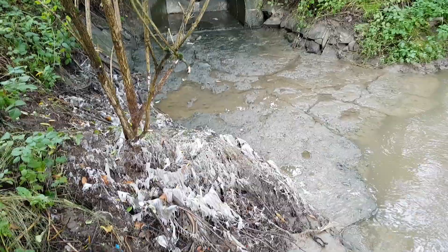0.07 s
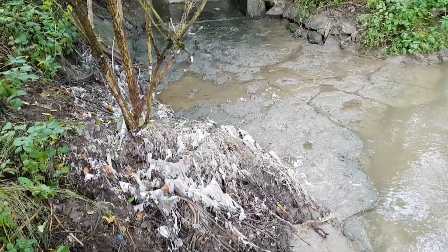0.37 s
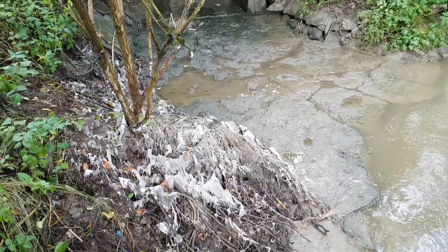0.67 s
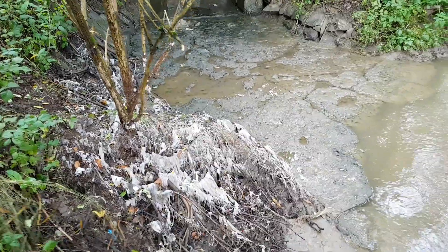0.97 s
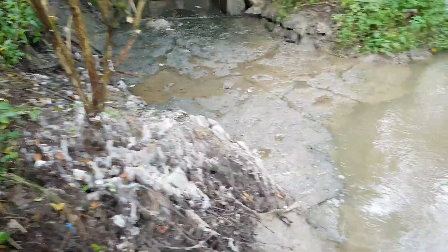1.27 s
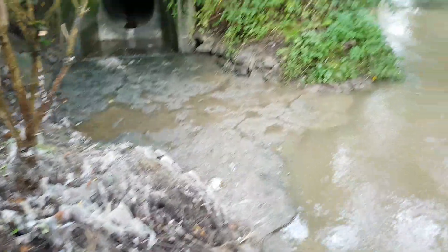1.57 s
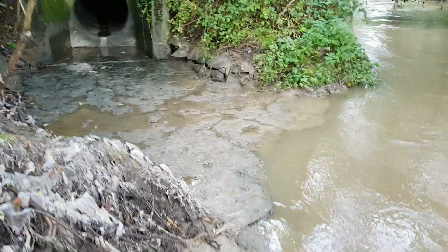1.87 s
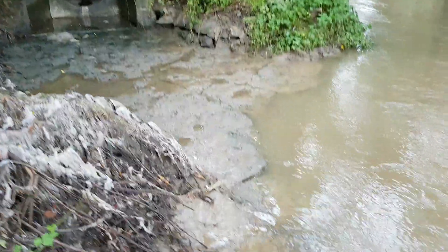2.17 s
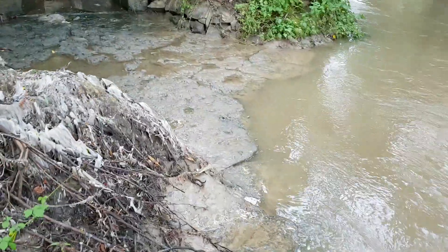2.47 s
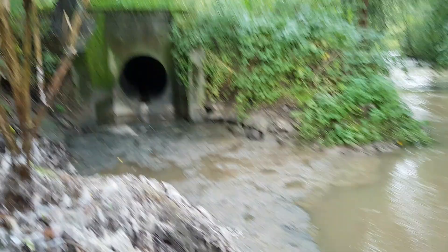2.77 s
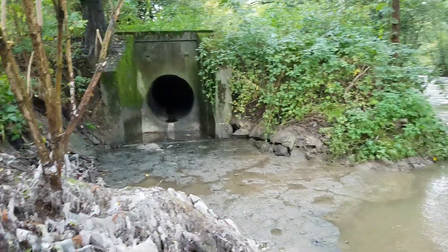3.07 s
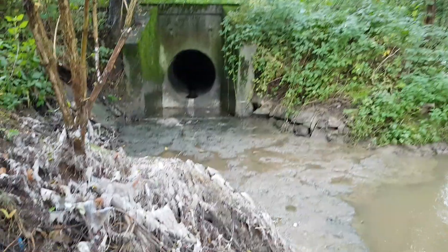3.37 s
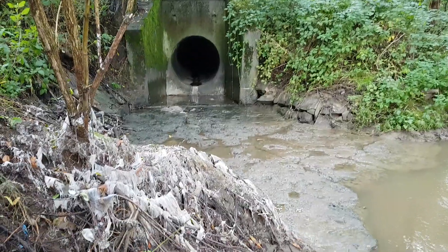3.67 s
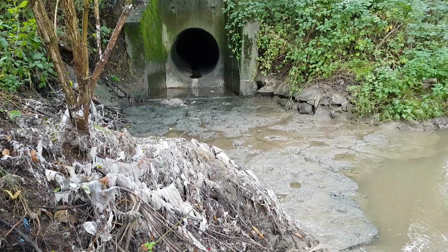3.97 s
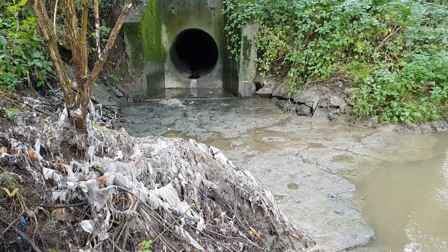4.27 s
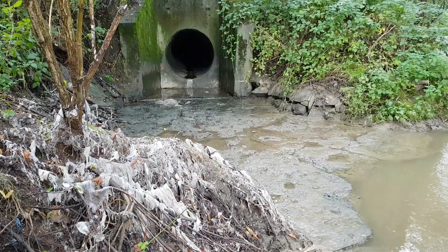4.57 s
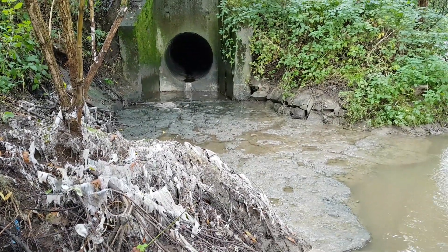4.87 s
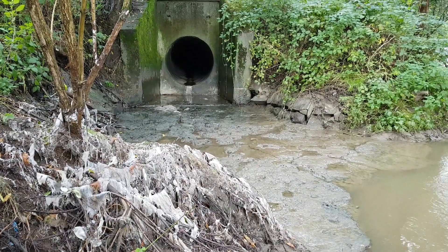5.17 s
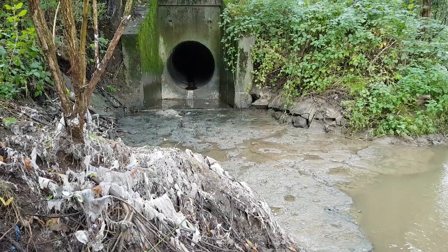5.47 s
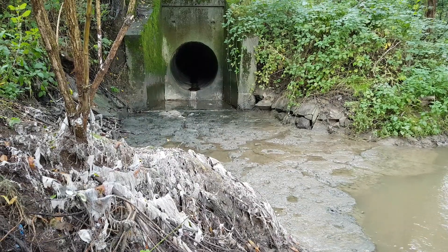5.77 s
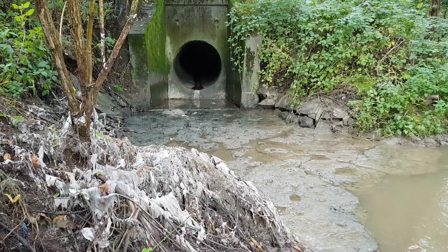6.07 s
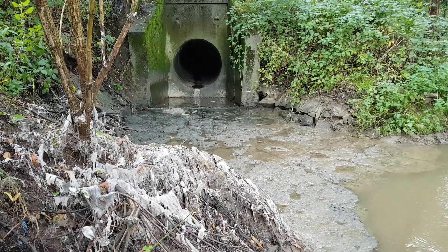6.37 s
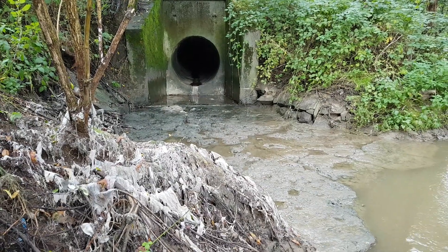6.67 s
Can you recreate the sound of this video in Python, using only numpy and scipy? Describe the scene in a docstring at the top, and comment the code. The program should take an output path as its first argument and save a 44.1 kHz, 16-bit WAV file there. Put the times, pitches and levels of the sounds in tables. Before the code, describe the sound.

Water runs from a drain pipe into a river with a steady, bubbly splashing, over a faint rumble of distant traffic. A sleeve swishes softly, then fingers knock and scrape loudly on the left side of the hand-held microphone, and the background dips for a moment. The water carries on, with a few faint high bird calls, one more sharp knock and some light taps.

```python
"""On a river bank, water runs from a drain pipe as a hand-held camera turns toward the outfall.
The water is broadband splash noise plus the resonance of many bubbles. Fingers knock and scrape beside
the left microphone port; the hardest knock makes the gain control duck for a second.
A sleeve swishes by friction and twigs tick underfoot. Distant engines drone, falling in pitch as they
pass (Doppler effect), small birds whistle, and the camera gives a faint electronic whine."""
import sys
import numpy as np
from scipy import signal
from scipy.fft import rfft, irfft
from scipy.io import wavfile
from scipy.ndimage import uniform_filter1d, minimum_filter1d

SR = 44100
rng = np.random.default_rng(int(sys.argv[2]) if len(sys.argv) > 2 else 0)


def transcribe(signal):
    """Save signal, clipped to [-1, 1], as a 16-bit WAV file at the path in sys.argv[1]."""
    frames = np.atleast_2d(signal).T
    limited = np.clip(frames, -1, 1)
    pcm = np.round(limited * 32767).astype(np.int16)
    wavfile.write(sys.argv[1], SR, pcm)


N = 301203
TIME = np.arange(N) / SR
FREQS = np.fft.rfftfreq(N, 1 / SR)


def water(bubble_db=-7, wash_db=-1, surge_db=0.68):
    """Superposition of splashes and bubbles; the spectrum follows the camera's heading."""
    # spectra facing the river and the drain: (frequency [Hz], left gain [dB], right gain [dB])
    river_spectrum = [(20, -100, -100), (285, -81.5, -80.5), (593, -81.5, -80.5), (1100, -83.5, -81.5),
                      (1870, -87.5, -82), (2260, -92.5, -85.5), (3360, -99.5, -97), (4400, -107, -99.5),
                      (5330, -113, -103.5), (8550, -117, -110), (8600, -130, -128), (16000, -140, -140)]
    drain_spectrum = [(20, -100, -100), (340, -84, -83.5), (590, -81, -83.5), (1210, -77, -81),
                      (1544, -72, -82), (2380, -80.5, -84.5), (3490, -98, -93.5), (4280, -101.5, -94.5),
                      (5730, -107, -99), (6150, -110, -107), (8240, -121, -105), (8650, -128, -122),
                      (16000, -140, -140)]
    # the camera's turn: (time [s], heading [0 river to 1 drain])
    heading = [(0, 0.023), (1.4, 0.042), (2.4, 0.2), (3.0, 0.55), (3.6, 0.88), (4.3, 1), (6.83, 0.93)]
    # strength of the water at the camera: (time [s], level [dB])
    flow = [(0, -1.55), (1.2, 1), (2.6, 3), (3.6, -1.7), (4.3, 0.2), (6.83, 0.15)]
    splash = ports(amp(wash_db) * wash() + amp(bubble_db) * bubbles())
    facing = np.clip(curve(heading), 0, 1)
    heard = (1 - facing) * colour(splash, river_spectrum) + facing * colour(splash, drain_spectrum)
    return heard * amp(curve(flow) + surge_db * wander(5.5))


def wash(patchy_db=0.5):
    """Splashing as modulated noise: its level drifts in patches of time and frequency."""
    cells = signal.stft(rng.standard_normal((2, N)), nperseg=512)[2]
    patches = uniform_filter1d(rng.standard_normal(cells.shape[1:]), size=7, axis=0)
    patches = unit_rms(uniform_filter1d(patches, size=10, axis=1))
    return unit_rms(signal.istft(cells * amp(patchy_db * patches), nperseg=512)[1][:, :N])


def bubbles(per_s=700, spread_db=3.0, cycles=9, rise=0.077, sizes=32, top_hz=7000):
    """Minnaert resonance: each bubble rings briefly, rising in pitch as it nears the surface."""
    out = np.zeros((2, N))
    for hz in np.geomspace(450, top_hz, sizes) * rng.uniform(1.0, 1.04, sizes):
        age = np.arange(int(5 * cycles * SR / hz)) * hz / SR / cycles  # in decay time constants
        ring = np.exp(-age) * np.sin(2 * np.pi * cycles * age * (1 + rise * age / 2))
        out += np.sqrt(hz) * unit_rms(shower(ring, per_s / sizes, spread_db))
    return unit_rms(out) * np.sqrt(2 * top_hz / SR)  # about the spectral density of unit white noise


def grip(pad_ratio=0.25, pad_db=-11, knock_right_db=-32, drag_right_db=-22):
    """Structure-borne sound: fingers knock and stick-slip on the case, far from the right port."""
    # knocks of the grip: (time [s], level [dB], pitch [Hz], asymmetry [0-1])
    contacts = [(2.5752, -25.5, 503, 0), (2.6993, -12, 700, 0), (2.7279, 6.5, 776, 0.66),
                (2.7336, -3.5, 65, 0.34), (2.7555, -8, 500, 0), (2.8081, 6, 770, 0.49),
                (2.822, -15, 600, 0.1), (2.8584, -12, 580, .25), (2.9481, -24, 450, 0.8),
                (3.079, -22, 846, 0.14), (3.137, -27.5, 170, 0), (3.497, -26.5, 395, 0.8),
                (4.0839, -32, 480, 0.6), (4.1731, -33, 430, 0.44), (4.326, -21, 560, .3),
                (4.3470, -7, 880, .9), (4.4377, -15, 487, .1)]
    # slides of a finger: (start [s], hold [s], level [dB])
    slides = [(2.549, 0.043, -22.5), (2.6, 0.13, -29), (2.687, 0.058, -13.5), (2.744, 0.045, 1.5),
              (2.839, 0.012, -11.5), (4.34, 0.0085, -16), (4.394, 0.0083, -18.5)]
    # friction of skin on the case: (frequency [Hz], gain [dB])
    skin_spectrum = [(20, -39), (150, -39.5), (350, -46.5), (700, -49.5), (1300, -54.5), (2400, -59),
                     (4500, -76), (7000, -90.5), (16000, -118)]
    knocks = np.zeros(N)
    for s, db, hz, asymmetry in contacts:
        pad_push = asymmetry * amp(pad_db) * press(hz * pad_ratio, asymmetry)  # the slower finger pad
        swing = press(hz, asymmetry) + pad_push
        add(knocks, s - len(swing) / 2 / SR, amp(db) * swing)
    slips = unit_rms(impulses(3000, 0.61) + rng.standard_normal((2, N)))
    pressure = np.max([amp(db) * stroke(s, 0.002, hold, t60=0.13) for s, hold, db in slides], axis=0)
    drag = colour(slips, skin_spectrum) * pressure + creaks(pressure)
    return knocks * near_left(knock_right_db) + drag * near_left(drag_right_db)


def press(hz, asymmetry):
    """Forced motion: a soft contact pushes the case in and lets it out, with no ring."""
    u = np.pi * hz * np.arange(-SR // 20, SR // 20) / SR
    swing = ((1 - asymmetry) * (1 - 2 * u ** 2) - 2 * asymmetry * u) * np.exp(-u ** 2)
    return swing / abs(swing).max()


def creaks(pressure, hz=10000, db=-52):
    """Stress release: the case gives tiny dry cracks while a finger bears on it."""
    cracks = shower(damped_ring(hz, cycles=0.16), per_s=130, spread_db=4)
    return amp(db) * unit_rms(cracks) * pressure ** 0.79


def taps(hollow_hz=636):
    """Cavity resonance: each tap sounds the same short note from the hollow of the case."""
    # fingertip taps by the left port: (time [s], peak level [dB])
    touches = [(4.0343, -26), (4.981, -31), (5.0903, -20.5), (5.1813, -32.5), (6.5086, -26)]
    out = np.zeros(N)
    for s, db in touches:
        add(out, s, amp(db) * damped_ring(hollow_hz, cycles=0.51))
    return out * near_left(right_db=-20)


def ticks(echo_db=-15):
    """Impulse excitation: twigs and the case give heavily damped snaps with a short scatter."""
    # sharp snaps: (time [s], level [dB], pitch [Hz], left minus right [dB])
    snaps = [(.069, -50, 6400, -7), (.475, -52, 6700, -7), (1.349, -44, 7100, 21.5),
             (1.529, -44, 6000, -11), (2.179, -38, 6450, -4), (2.570, -40.5, 10500, 21),
             (2.669, -45, 9000, 13), (2.6984, -15, 1760, 21), (2.7060, -21.5, 1660, 4),
             (2.727, -19, 3600, 12), (2.8077, -9.5, 1530, 26), (2.842, -40, 8700, 11),
             (2.854, -43, 6600, 6), (4.3245, -31, 1720, 13), (4.3473, -23.5, 1850, 4),
             (5.0904, -40, 4700, 7), (6.166, -52, 7800, -15), (6.652, -52.5, 6860, -20)]
    out = np.zeros((2, N))
    for s, db, hz, left_db in snaps:
        add(out, s, amp(db) * pan(left_db) * damped_ring(hz, cycles=0.51))
    return out + amp(echo_db) * echoes(out, t60=0.08)


def sleeve(catch_db=-6, fizz_hz=7600, flutter_db=1.2):
    """Friction noise: fabric slides over fabric with a fine hiss and catching threads."""
    # rubbing cloth: (frequency [Hz], left gain [dB], right gain [dB])
    cloth_spectrum = [(400, -110, -110), (1500, -112, -77.5), (2630, -84, -77.5), (4120, -91.5, -86),
                      (5200, -95, -83), (6140, -93.5, -86), (7260, -96.5, -92.5), (7950, -93, -90.5),
                      (9100, -100, -109), (12500, -97, -109), (16000, -102, -108)]
    # sleeve strokes: (start [s], rise [s], hold [s], 60 dB decay [s], level [dB], treble gain [dB])
    strokes = [(0.976, 0.31, 0.08, 1.5, -9.5, -0.5), (1.503, .3, 0.1, 1.16, -1.4, -1.5),
               (2.085, .02, 0.32, 0.72, -2, 1.5), (2.54, 0.038, 0.13, .9, -8, 0.5),
               (2.73, 0.017, 0.038, .4, -1, -7), (4.3, 0.11, 0.057, .9, -10.5, -12)]
    threads = rng.standard_normal((2, N)) + amp(catch_db) * impulses(1500, 5.5)
    rub = colour(unit_rms(threads), cloth_spectrum)
    fizz = signal.sosfiltfilt(signal.butter(2, fizz_hz, "highpass", fs=SR, output="sos"), rub)
    swish = sum(amp(db) * stroke(s, rise, hold, t60) * (rub - fizz + amp(treble_db) * fizz)
                for s, rise, hold, t60, db, treble_db in strokes)
    return (swish + ribbed_fold()) * amp(flutter_db * wander(20))


def ribbed_fold(db=-50, jitter=0.16):
    """Nearly periodic friction: the ribs of a fold zip past, rising in pitch."""
    gain, hz = swell(at_s=1.87, width_s=0.065, hz=2650, octaves_per_s=1.8)
    rib_hz = hz * (1 + jitter * np.array([wander(780), wander(770)]))
    return amp(db) * gain * np.sin(phase(rib_hz)) * pan(-18.5)


def traffic(engines_db=1.5):
    """Broadband road rumble with engine harmonics: two vehicles pass, a third engine swells under load."""
    # far road noise: (frequency [Hz], gain [dB])
    road_spectrum = [(15, -84), (35, -71.5), (55, -68.5), (70, -65), (95, -67), (125, -66), (170, -72.5),
                     (240, -77.5), (400, -95), (900, -115)]
    # strength of the rumble: (time [s], level [dB])
    road_level = [(0, -8.5), (2, 0.5), (3.4, -4.5), (4.6, -2), (6.83, -1)]
    # passing vehicles: (nearest at [s], nearest distance over speed [s], firing rate [Hz],
    # Mach number, fundamental level [dB], octave level [dB])
    passes = [(3.0, 1.5, 83, .1, -46.5, -56.5), (3.5, 5.1, 66.3, 0.0496, -55, -58)]
    rumble = colour(ports(rng.standard_normal((2, N))), road_spectrum) * amp(curve(road_level))
    load, hz = swell(at_s=2.28, width_s=0.34, hz=106.5, octaves_per_s=0.06)
    engines = sum(vehicle(*row) for row in passes) + load * engine(hz, first_db=-44, octave_db=-59)
    return (rumble + amp(engines_db) * engines) * pan(1.16)


def vehicle(nearest_s, pass_s, hz, mach, first_db, octave_db, exhaust_db=7.5):
    """Doppler shift and spherical spreading; the octave grows as the exhaust turns to the listener."""
    along = (TIME - nearest_s) / pass_s
    distance = np.hypot(1, along)  # in units of the nearest distance
    receding = along / distance
    return engine(hz * (1 - mach * receding), first_db, octave_db + exhaust_db * receding) / distance


def engine(hz, first_db, octave_db, waver_db=3, drift_hz=1.114):
    """The lowest two harmonics of the firing rate, wavering on their way through the air."""
    firing = phase(hz + drift_hz * wander(3.88))
    first = amp(first_db + waver_db * wander(3.7)) * np.sin(firing)
    return first + amp(octave_db + waver_db * wander(4.5)) * np.sin(2 * firing)


def birds(direct_db=-4.5, echo_db=-5.5):
    """Frequency modulation: high whistles glide and buzz off to the right, smeared by the trees."""
    # thin calls: (start [s], length [s], first pitch [Hz], last pitch [Hz], arch [Hz], level [dB],
    # buzz [share of pitch])
    calls = [(0.323, 0.065, 8050, 8050, 150, -64, 0.02), (3.363, 0.1, 8120, 7150, -100, -52, 0.014),
             (3.55, 0.085, 7500, 6070, 2, -55, .018), (5.422, 0.059, 8000, 8000, 700, -62, .012),
             (5.633, 0.46, 7350, 7330, 252, -72, 0.049)]
    song, quaver = np.zeros(N), wander(480)
    for s, length, first_hz, last_hz, arch_hz, db, buzz in calls:
        u = np.linspace(0, 1, int(length * SR))
        hz = first_hz + (last_hz - first_hz) * u + arch_hz * np.sin(np.pi * u)
        hz *= 1 + buzz * np.interp(s + u * length, TIME, quaver)
        add(song, s, amp(db) * np.sin(phase(hz)) * signal.windows.tukey(len(u), 0.48))
    return (amp(direct_db) * song + amp(echo_db) * echoes(song[None], t60=0.5)) * pan(-8)


def stalks(hz=6500, db=-83):
    """Brittle fracture: now and then a dry stalk on the bank gives way with a tiny snap."""
    snaps = shower(damped_ring(hz, cycles=0.95), per_s=9, spread_db=6.0)
    return amp(db) * unit_rms(snaps + echoes(snaps, t60=0.046)) * pan(-0.5)


def whine(hz=11900, jitter_hz=25, db=-88, start_s=2.6, stop_s=6.6):
    """Electronic oscillation in the camera: a thin tone, mostly on the left."""
    tone = np.sin(phase(hz + jitter_hz * wander(200)))
    return amp(db) * tone * (TIME > start_s) * (TIME < stop_s) * pan(6.9)


def ports(x, right_lead_rad=0.52):
    """Diffuse-field coherence: two unrelated signals become a port pair, alike in the bass."""
    # likeness of the two ports: (frequency [Hz], coherence [limited below to -1 to 1])
    likeness = [(60, 0.45), (150, 0.96), (300, 0.9), (640, 0.46), (1000, 0.14), (1400, -0.28), (2200, 0.1),
                (5000, -0.1), (16000, -1.5)]
    left, unrelated = rfft(x)
    coherence = np.clip(spectrum(likeness)[0], -1, 1)
    right = coherence * left + np.sqrt(1 - coherence ** 2) * unrelated
    return irfft(np.array([left, right * np.exp(1j * right_lead_rad)]), N)


def echoes(x, t60, build_s=0.0093):
    """Scattering from banks and trees: a decaying tail, independent at each port."""
    t = np.arange(SR // 2) / SR
    tail = rng.standard_normal((2, len(t))) * amp(-60 * t / t60) * (1 - np.exp(-t / build_s))
    return signal.fftconvolve(x, tail / np.linalg.norm(tail[0]), axes=1)[:, :N]


def damped_ring(hz, cycles):
    """A heavily damped oscillation of peak 1 that swells and dies within a few cycles."""
    turns = hz * np.arange(SR // 10) / SR
    ring = np.gradient(turns * np.exp(-turns / cycles) * np.sin(2 * np.pi * turns))
    return ring / abs(ring).max()


def impulses(per_s, spread_db):
    """A Poisson process: sparse clicks of uneven size in two channels."""
    size = amp(spread_db * np.minimum(rng.exponential(1, (2, N)), 4))
    return unit_rms(size * rng.choice([-1, 1], (2, N)) * (rng.random((2, N)) < per_s / SR))


def shower(ring, per_s, spread_db):
    """Shot noise: random impulses each excite the same ring."""
    return signal.oaconvolve(impulses(per_s, spread_db), ring[None], axes=1)[:, :N]


def stroke(start, rise, hold, t60):
    """An envelope that rises, holds and decays exponentially."""
    age = TIME - start
    return np.clip(age / rise, 0, 1) * amp(-60 * np.maximum(age - rise - hold, 0) / t60)


def swell(at_s, width_s, hz, octaves_per_s):
    """A Gaussian envelope and an exponential pitch glide."""
    age = np.clip(TIME - at_s, -4 * width_s, 4 * width_s)
    return np.exp(-(age / width_s) ** 2), hz * 2 ** (octaves_per_s * age)


def wander(rate_hz):
    """Low-pass noise of rms 1."""
    return unit_rms(irfft(rfft(rng.standard_normal(N)) * np.exp(-(FREQS / rate_hz) ** 2), N))


def colour(x, rows):
    """Spectral shaping: white noise of rms 1 takes the table's values as its density in dB per Hz."""
    return irfft(rfft(x) * amp(spectrum(rows)) * np.sqrt(SR / 2), N)


def spectrum(rows):
    """Each column of a table, interpolated along log frequency."""
    hz, *columns = np.transpose(rows)
    return np.array([np.interp(np.log(FREQS + 1), np.log(hz + 1), c) for c in columns])


def curve(rows):
    """Each column of a table, interpolated along time."""
    s, *columns = np.transpose(rows)
    return np.array([np.interp(TIME, s, c) for c in columns])


def phase(hz):
    """Phase as the integral of frequency."""
    return 2 * np.pi * np.cumsum(hz, axis=-1) / SR


def amp(db):
    """Decibels to gain."""
    return 10 ** (np.asarray(db) / 20)


def unit_rms(x):
    """Scales to rms 1."""
    return x / np.sqrt(np.mean(x ** 2) + 1e-20)


def pan(left_db):
    """Channel gains for a left-right level difference."""
    return amp(np.array([[left_db], [-left_db]]) / 2)


def near_left(right_db):
    """Channel gains that attenuate only the right port."""
    return np.array([[1], [amp(right_db)]])


def add(mix, s, sound):
    """Mixes a sound in at time s."""
    part = mix[..., round(s * SR):][..., :sound.shape[-1]]
    part += sound[..., :part.shape[-1]]


def scene():
    """Superposition of all sources at the two ports."""
    return water() + traffic() + sleeve() + grip() + taps() + ticks() + stalks() + birds() + whine()


def record(dry, threshold_db=-4.0, slope=1.68, hold_s=0.49, recover_db_per_s=10, attack_s=0.016):
    """Microphone hiss, automatic gain control that holds and recovers slowly, clipping, band limit."""
    # self-noise of the microphones: (frequency [Hz], density [dB per Hz])
    hiss_spectrum = [(20, -120), (9000, -118.5), (12000, -115), (15500, -112.5)]
    x = dry + colour(rng.standard_normal((2, N)), hiss_spectrum)
    peak_db = 20 * np.log10(np.clip(abs(x).max(0), 1e-6, 1))
    over_db = np.maximum(peak_db - threshold_db, 0)
    hold = int(hold_s * SR)
    held_db = -minimum_filter1d(-over_db, hold, origin=(hold - 1) // 2, mode="constant")
    recovery_db = recover_db_per_s * TIME
    control_db = np.maximum.accumulate(held_db + recovery_db) - recovery_db
    pole = np.exp(-1 / (attack_s * SR))
    duck_db = slope * signal.lfilter([1 - pole], [1, -pole], control_db)
    clipped = np.clip(x * amp(-duck_db), -0.97, 0.97)
    lowpass = signal.firwin(511, cutoff=15900, window=("kaiser", 9), fs=SR)
    return signal.oaconvolve(clipped, lowpass[None], "same")


dry = scene()
out = record(dry)
transcribe(out)
```